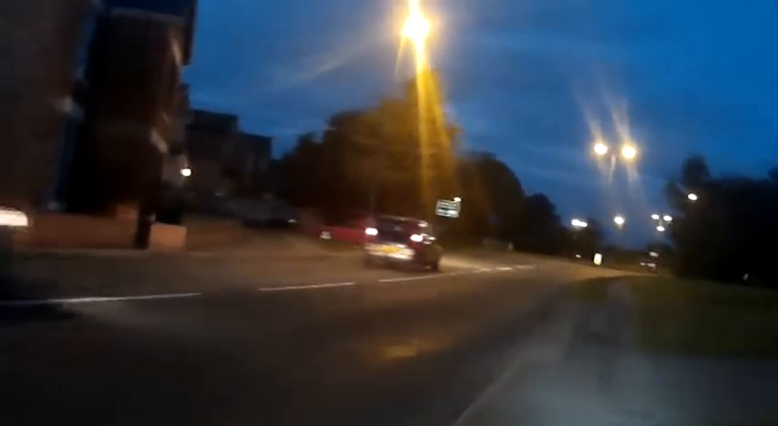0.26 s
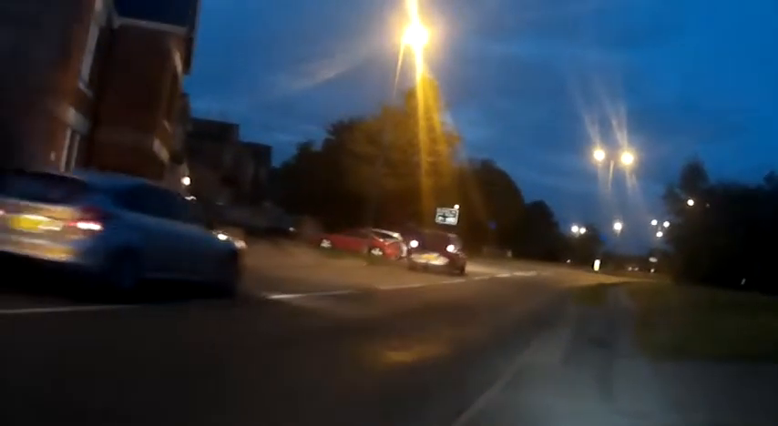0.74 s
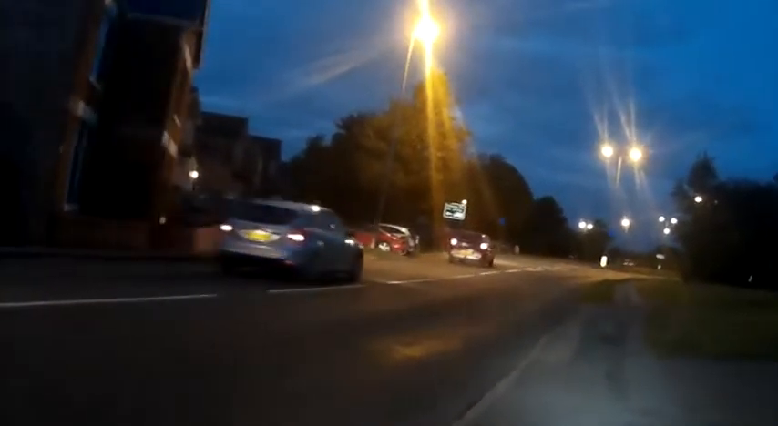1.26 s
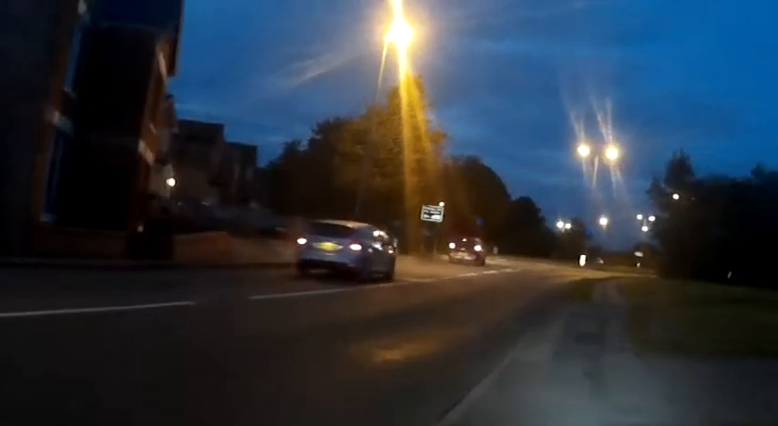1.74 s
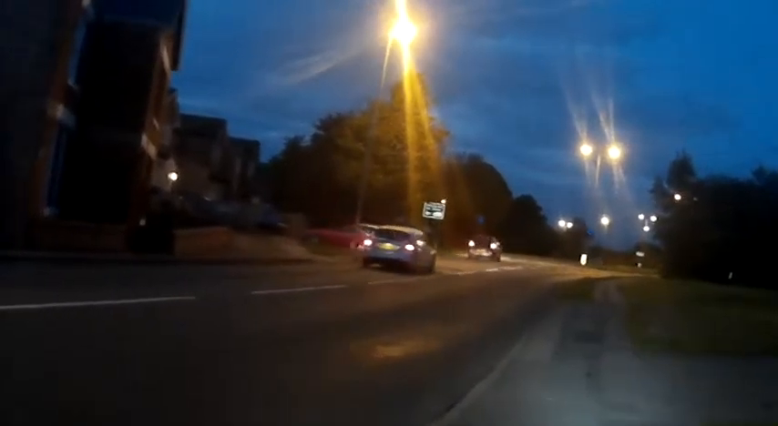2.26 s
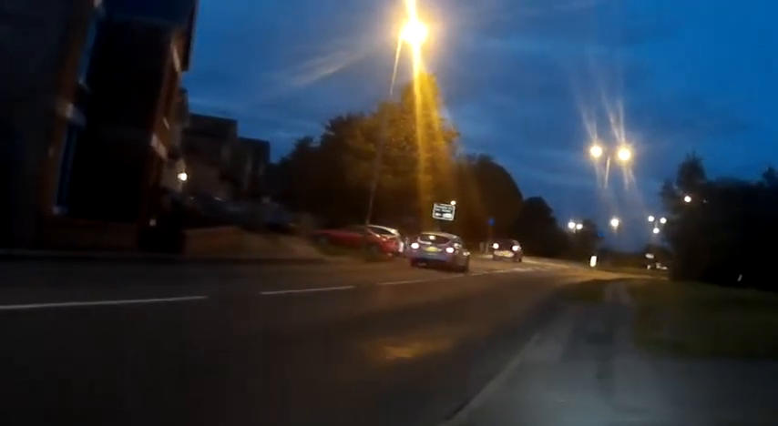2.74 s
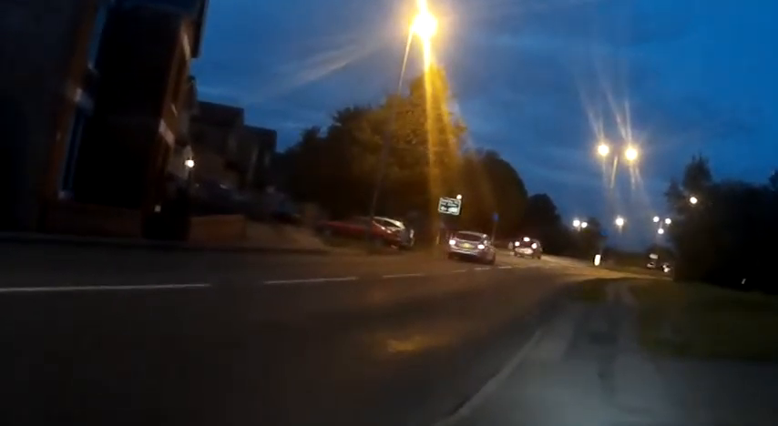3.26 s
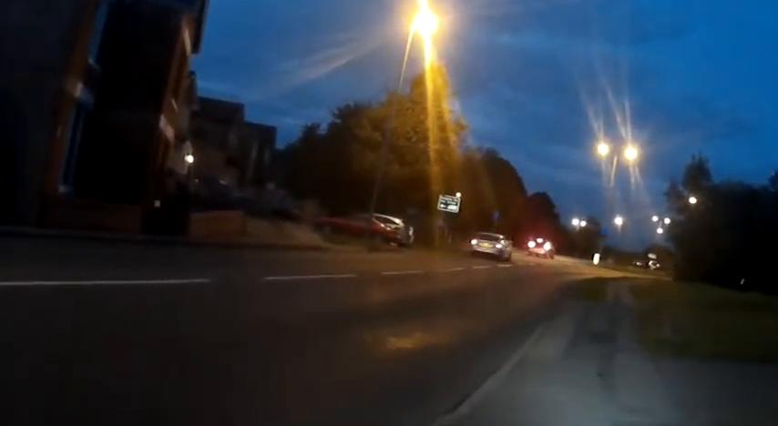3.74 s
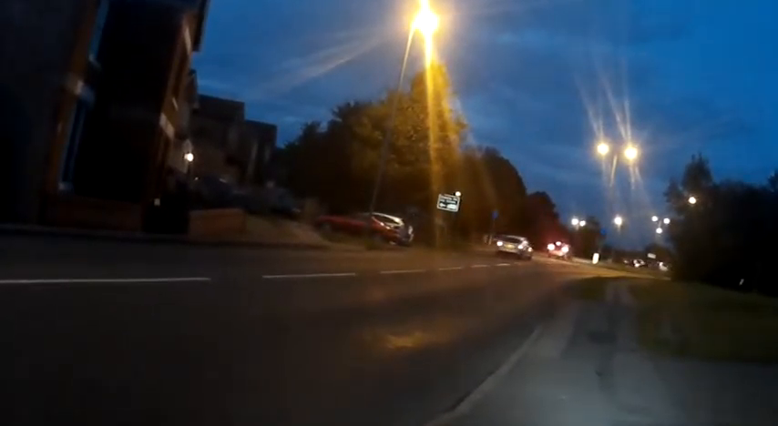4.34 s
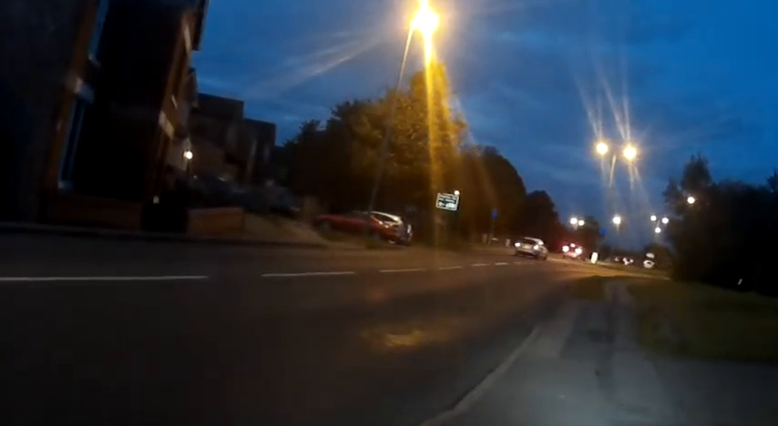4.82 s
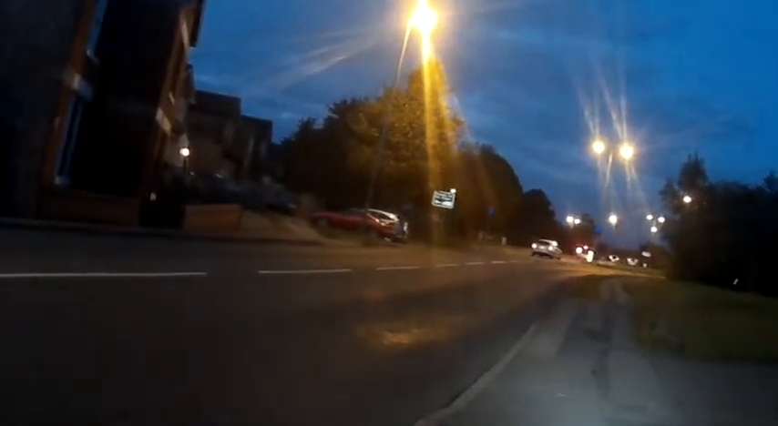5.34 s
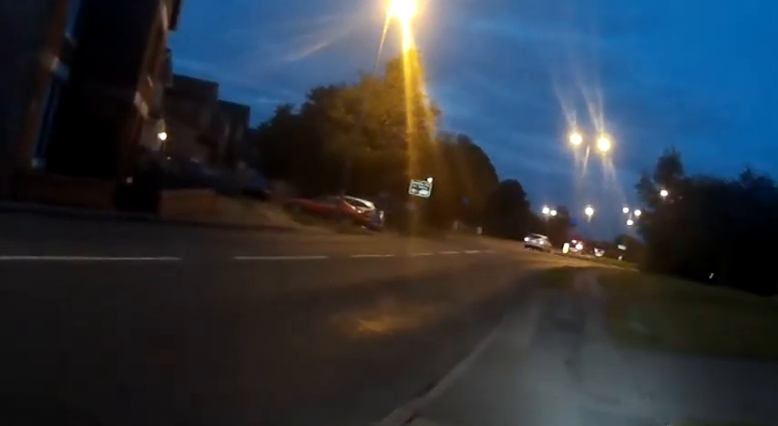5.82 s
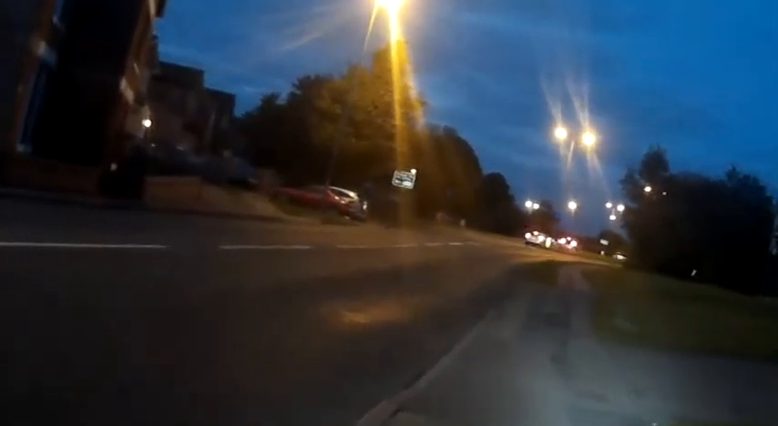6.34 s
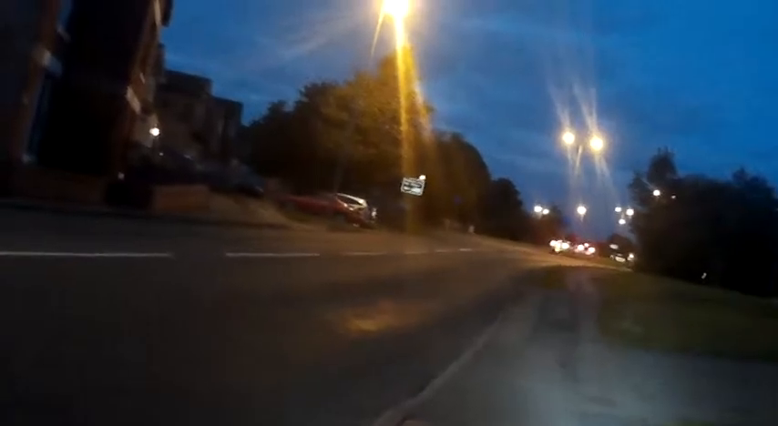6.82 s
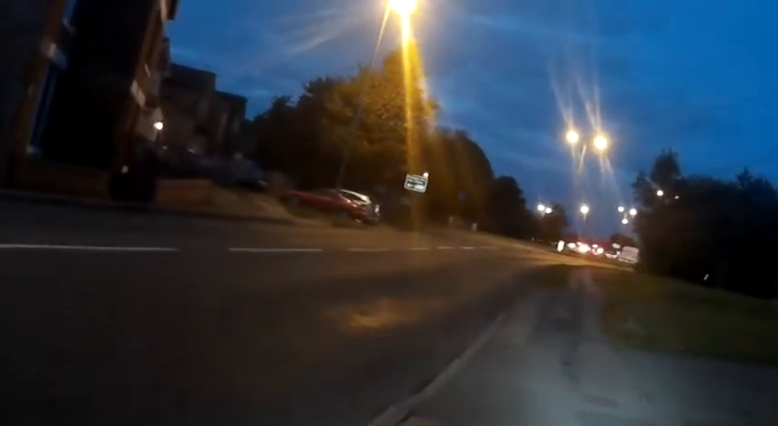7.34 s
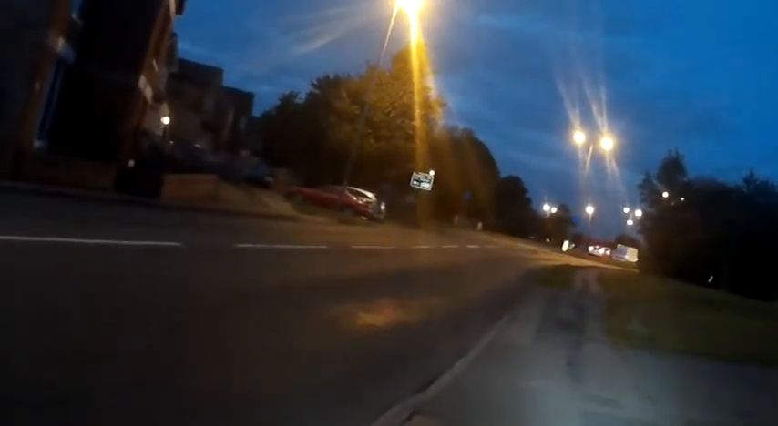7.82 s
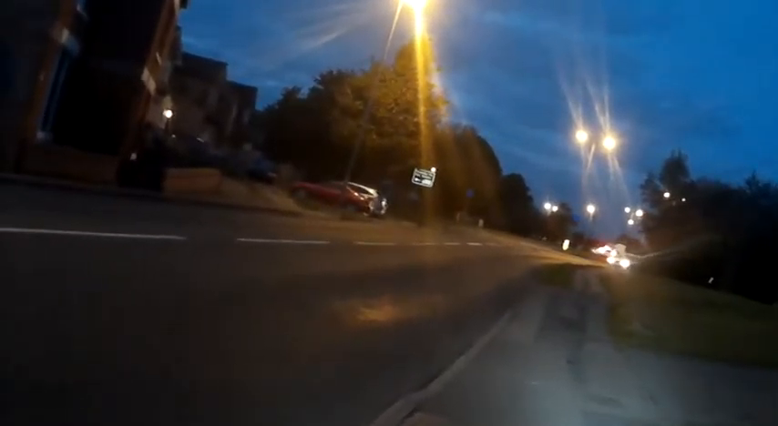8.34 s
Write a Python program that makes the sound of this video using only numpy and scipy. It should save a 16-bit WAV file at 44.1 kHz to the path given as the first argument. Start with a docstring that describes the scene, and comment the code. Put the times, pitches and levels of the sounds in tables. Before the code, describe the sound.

Sharp plastic clacks and hollow thumps from a bicycle's loose camera, with a brief car whoosh at the start and faint distant traffic afterwards.

```python
"""A small camera's plastic case knocks, rubs, rattles and creaks in its mount on a bicycle's handlebar.
Short blows and tiny catches ring the case, its mount and the bar, each built from resonances.
The case rings on in fading tones, low tones sway the bar, the frame trembles and a brake squeaks faintly.
A car passes and drives off: shaped broad noise, partly boxed in by the case, over a low street rumble.
The microphone adds a faint hiss and whine."""
import sys
import numpy as np
from scipy import signal
from scipy.fft import rfft, irfft, next_fast_len
from scipy.io import wavfile
from scipy.ndimage import uniform_filter1d, map_coordinates

SR = 44100
rng = np.random.default_rng(int(sys.argv[2]) if len(sys.argv) > 2 else 0)


def to_wav(s):
    """Save 16-bit WAV."""
    ch = np.atleast_2d(s).T  # columns
    pcm = np.round(np.clip(ch, -1, 1) * 32767)  # PCM
    wavfile.write(sys.argv[1], SR, pcm.astype(np.int16))


N = 377937
T = np.arange(N) / SR  # time of every sample [s]

# resonances of the plastic shell, before a blow favours some: (frequency [Hz], width [Hz], level [dB])
SHELL_MODES = [(552, 31, -7.5), (583, 120, -5.5), (724, 50, 2.5), (1026, 110, -7), (1277, 82, -0.5),
               (1695, 110, -3.5), (1906, 90, -6.5), (2144, 83, -6.5), (2460, 120, -16), (2720, 90, -11),
               (3160, 260, -11.5), (3960, 100, -18.5), (4400, 390, -19.5), (5700, 400, -20),
               (5920, 490, -22.5), (7700, 7900, -34.5), (11160, 700, -26), (14500, 2400, -41.5)]
# resonances of the mount, before a blow favours some: (frequency [Hz], width [Hz], level [dB])
MOUNT_MODES = [(232, 13, -11), (265, 17, 0.5), (336, 170, -7), (399, 26, 2.5), (445, 33, -6)]
# tone balance of the low street rumble: (frequency [Hz], relative level per Hz [dB])
STREET_SPECTRUM = [(20, -3.5), (40, 6), (70, -9), (150, -10.5), (300, -11.5), (600, -22.5), (2000, -46)]


def amp(db):
    """Turn decibels into a gain."""
    return 10 ** (np.asarray(db) / 20)


def unit(x):
    """Scale a sound to an rms of 1."""
    return x / np.sqrt(np.mean(x ** 2) + 1e-20)


def curves(rows):
    """Join the points of each column after the time with straight lines, one value per sample."""
    s, *columns = np.transpose(rows)
    return [np.interp(T, s, column) for column in columns]


def wobble(rate):
    """Draw a smooth random curve through `rate` random points a second."""
    points = rng.standard_normal(int(N * rate / SR) + 4)
    return map_coordinates(points, [T * rate])


def filtered(x, response):
    """Multiply the spectrum of a sound by a response that depends on frequency."""
    size = next_fast_len(len(x) + SR // 4)  # spare room, so that the ringing does not wrap around
    spectrum = rfft(x, size) * response(np.fft.rfftfreq(size, 1 / SR))
    return irfft(spectrum, size)[:len(x)]


def resonate(x, modes):
    """Send a force through a body whose resonances each ring at their own frequency."""
    def response(f):
        total = 0
        for k, (center, width, db) in enumerate(modes):
            damping = 1j * f * width
            peak = damping / (center * center - f * f + damping)
            total = total + (-1) ** k * amp(db) * peak  # every other mode is flipped
        return total
    return filtered(x, response)


def cut(x, hz, kind, order=2):
    """Keep only what lies below ("low") or above ("high") a frequency."""
    sos = signal.butter(order, min(hz, SR / 2 - 1), kind, fs=SR, output="sos")
    return signal.sosfilt(sos, x)


def noise(points):
    """Make noise of rms 1 whose tone balance follows (frequency [Hz], level [dB]) points."""
    hz, db = np.transpose(points)
    return unit(filtered(rng.standard_normal(N),
                         lambda f: amp(np.interp(np.log(f + 1), np.log(hz), db))))


def add(track, s, sound):
    """Mix a sound into the track at a time in seconds."""
    part = track[max(0, round(s * SR)):][:len(sound)]
    part += sound[:len(part)]


def struck(modes, favoured_hz, lift_db):
    """The place of a blow favours the resonances near one frequency."""
    reach_octaves = .22
    lifted = []
    for hz, width, db in modes:
        distance = np.log2(hz / favoured_hz) / reach_octaves
        lifted.append((hz, width, db + lift_db * np.exp(-distance ** 2)))
    return lifted


def shell(force, hardness_hz, modes):
    """The shell clacks; a soft contact barely reaches its high resonances."""
    return cut(cut(resonate(force, modes), hardness_hz, "low"), 610, "high")


def mount(force, modes):
    """The clamp answers a force with a hollow ring."""
    return cut(cut(resonate(force, modes), 810, "low"), 110, "high")


def bar(force):
    """The handlebar answers a force with a dull thump from two broad resonances."""
    # resonances of the bar: (frequency [Hz], width [Hz], level [dB])
    bar_modes = [(95, 140, -0.34), (144.96, 200, 0.34)]
    return cut(resonate(force, bar_modes), 390, "low")


def traffic(direct_db=-6, boxed_db=-2, car_rumble_db=3):
    """Broad noise, partly boxed in by the case, over a low rumble that grows when the noise is loud."""
    # level of the broad noise before slow wavering: passing car with rubbing and a brief swell of
    # background noise, then far traffic: (time [s], level [dB])
    broad_levels = [(0, -55), (.4, -55), (.7, -48.5), (.9, -47.5), (1.1, -64), (1.5, -63.5), (2, -66.5),
                    (3, -67), (3.6, -69), (4.4, -75.5), (5.2, -70.5), (7, -74.5), (8.57, -75)]
    # tone balance of the direct broad noise: (frequency [Hz], relative level per Hz [dB])
    broad_spectrum = [(40, -23), (100, -9.5), (250, -6.5), (570, -12), (1010, -15.5), (1300, -15),
                      (1800, -25), (2600, -29.5), (8000, -38.5), (14000, -55.5)]
    # resonances on the way through the air into the case: (frequency [Hz], width [Hz], level [dB])
    air_modes = [(397, 60, -2.5), (690, 140, -1), (1280, 210, 3), (1700, 140, -7.5), (1910, 73, -6),
                 (3300, 160, -22.5)]
    steady_rumble_db = -65
    broad_db, = curves(broad_levels)
    direct = noise(broad_spectrum)
    boxed = unit(cut(resonate(rng.standard_normal(N), air_modes), 3500, "low"))
    broad = amp(direct_db) * direct + amp(boxed_db) * boxed
    rumble_gain = np.hypot(amp(steady_rumble_db), amp(broad_db + car_rumble_db))
    return amp(broad_db + .8 * wobble(3.2)) * broad + rumble_gain * noise(STREET_SPECTRUM)


def sliding():
    """Each slide of the case swells, holds and dies away; gives gains for mount ring and shell scrape."""
    # slides: (time [s], length [s], mount ring level [dB], shell scrape level [dB])
    slide_list = [(0, 0.01, -51.5, -50), (0.132, 0.073, -49.5, -53), (0.307, .1, -58.5, -60),
                  (0.449, 0.11, -47.5, -53), (0.521, 0.096, -46, -45.5), (0.663, .06, -48.5, -51),
                  (0.725, 0.08, -37.5, -42.5), (0.836, 0.21, -62, -56.5), (1.1, 0.38, -64.5, -68.5),
                  (2.178, .07, -37, -42), (2.26, 0.13, -50.5, -52.5), (2.498, .14, -53.5, -58),
                  (5.329, .1, -52.5, -51.5), (5.407, .1, -47.5, -50.5), (5.514, 0.045, -46, -46),
                  (5.941, 0.052, -38, -45.5), (6.05, .03, -34.5, -38.5), (6.12, 0.098, -45.5, -63),
                  (6.247, 0.096, -52.5, -56.5), (6.5, 0.61, -64.5, -69.5), (7.99, 0.22, -58.5, -68.5)]
    attack_s, release_db_per_s = .02, 170
    gains = np.zeros((2, N))
    for s, length, ring_db, scrape_db in slide_list:
        swell = np.clip((T - s) / attack_s, 0, 1)
        fade = amp(-release_db_per_s * np.maximum(T - s - length, 0))
        gains = np.maximum(gains, amp([[ring_db], [scrape_db]]) * swell * fade)
    return gains


def rubbing(ring, scrape, hardness_hz=2100, thump_db=-11, ring_hz=410, scrape_hz=1300):
    """Sliding plastic catches on many tiny ridges of uneven size."""
    catches_per_s, spread_db, uneven_db = 900, 3, 2.5
    catches = (rng.random(N) < catches_per_s / SR) * rng.choice([-1, 1], N)
    sizes = amp(spread_db * np.minimum(rng.exponential(size=N), 3))
    force = catches * sizes * amp(uneven_db * wobble(60))
    hollow = unit(mount(force, struck(MOUNT_MODES, ring_hz, lift_db=1.5)))
    body = hollow + amp(thump_db) * unit(bar(force))
    scraping = unit(shell(force, hardness_hz, struck(SHELL_MODES, scrape_hz, lift_db=3)))
    return ring * body + scrape * scraping


def rattles(ring, scrape, ring_db=-10, clack_db=-8, hardness_hz=2500, ring_hz=310, chatter_s=.002):
    """The loose case taps at random while it slides; each tap is a short chatter."""
    taps_per_s, spread_db = 28, 4
    sizes = amp(spread_db * np.clip(rng.standard_normal(N), -2, 2))
    taps = (rng.random(N) < taps_per_s / SR) * sizes
    fading = signal.lfilter([1], [1, -np.exp(-1 / (chatter_s * SR))], taps)
    force = fading * rng.standard_normal(N)
    body = unit(mount(force, struck(MOUNT_MODES, ring_hz, lift_db=6)))
    clack = unit(shell(force, hardness_hz, struck(SHELL_MODES, 3100, lift_db=4.5)))
    return amp(ring_db) * ring * body + amp(clack_db) * scrape * clack


def knocks(chatter=300):
    """Each contact is a blow plus a chatter, stronger and duller the longer the faces touch."""
    # contacts of the case: (time [s], contact time [s], bar thump level [dB], mount ring level [dB],
    # favoured mount frequency [Hz], shell clack level [dB], favoured shell frequency [Hz])
    contacts = [ (.033, 0.0016, -75, -54, 270, -45.5, 1340), (.159, 0.0025, -52, -57, 400, -45, 1290),
                (0.174, 0.0024, -54, -71, 436, -37, 1110), (.367, 0.0012, -61, -55, 277, -47.5, 1720),
                (.512, 0.0022, -51, -49, 330, -43.5, 1160), (.549, 0.0022, -31, -36.5, 300, -46, 1290),
                (.56, 0.00073, -36, -39, 290, -38.5, 650), (.588, .002, -45, -51, 282, -42.5, 1290),
                (.61, 0.0013, -35.5, -34.5, 317, -42.5, 715), (0.717, 0.0027, -42, -29.5, 418, -40.5, 710),
                (.765, .0034, -61, -31.5, 327, -40, 715), (.781, 0.0033, -61, -51, 397, -36.5, 1700),
                (.811, .003, -52, -40, 414, -36.5, 1120), (0.828, 0.0013, -46.5, -58, 280, -39, 710),
                (1.11, 0.0027, -61, -55, 403, -64, 1020), (1.337, 0.0091, -61, -54, 407, -70, 1290),
                (1.526, 0.0031, -48, -51.5, 264, -65, 715), (2.1064, .0023, -67, -39, 318, -42, 690),
                (2.173, .002, -43.5, -34.5, 433, -42.5, 1020), (2.181, 0.0017, -39.5, -39, 395, -33.5, 760),
                (2.235, .0037, -54, -35, 397, -38, 715), (2.2557, 0.0011, -45, -31, 440, -22, 1700),
                (2.335, 0.0013, -49.5, -51, 280, -37.5, 1110), (2.357, .0009, -58, -52.5, 280, -61, 1970),
                (2.375, 0.0019, -48, -45.5, 394, -40, 1660), (2.3853, 0.0011, -38.5, -28, 340, -16.5, 820),
                (2.565, 0.0024, -76, -42.5, 264, -50.5, 1290),
                (2.604, 0.0012, -72, -42.5, 263, -55.5, 1290),
                (2.8707, 0.00053, -51.5, -27, 330, -26.5, 1780), (2.879, 0.00044, -35, -29, 290, -22, 2280),
                (2.881, 0.00037, -45.5, -34.5, 290, -23, 5600), (2.935, 0.0021, -40, -52, 276, -62, 630),
                (3.237, .003, -68, -55, 272, -75.5, 630), (4.859, .0033, -57.5, -55.5, 329, -64, 690),
                (4.958, .002, -82, -78, 330, -66.5, 1290), (5.3, .004, -43, -65, 280, -64, 630),
                (5.313, 0.0044, -42, -57, 290, -65, 1290), (5.547, 0.0049, -40.5, -54, 358, -62, 1290),
                (5.658, 0.0058, -70, -38, 360.4, -52.5, 1290), (5.855, 0.0058, -48.5, -49, 405, -56, 1290),
                (5.914, 0.0023, -41, -31.5, 424, -44.5, 1270), (5.921, 0.0019, -34, -40.5, 396, -46, 1270),
                (5.939, .001, -46.5, -22, 413, -36, 2800), (5.953, 0.0011, -33.5, -33, 400, -37.5, 2180),
                (6.001, .0016, -63, -48, 400, -50, 1800), (6.034, .002, -33, -28, 413, -42, 615),
                (6.067, .0022, -50.5, -23, 438, -26, 623), (6.075, 0.0011, -31, -22, 405, -33, 2910),
                (6.104, .002, -47.5, -40.5, 405, -42, 1850), (6.24, .0018, -44, -37.5, 404, -44, 1295),
                (6.679, 0.0026, -47.5, -53.5, 376, -62.5, 1290),
                (6.8425, 0.0016, -66, -29.5, 330, -37, 1290), (6.8475, 0.0014, -63, -31, 303, -31, 2710),
                (7.021, .0045, -70, -45.5, 330, -76, 1290), (7.328, 0.0033, -63.5, -48, 397, -70.5, 1290),
                (7.576, 0.0017, -59, -64, 277, -69, 1640), (7.999, 0.003, -60.5, -41, 390, -52.5, 1290),
                (8.037, 0.0042, -56, -43, 435, -50.5, 1295), (8.144, 0.0028, -70, -44.5, 369, -56.5, 1290),
                (8.165, 0.005, -74, -48.5, 300, -72, 630)]
    usual_contact_s = .002
    # reach into the shell's high resonances at the usual contact; how fast it rises for briefer ones
    hardness_hz, hardness_power = 1380, 1.25
    track, t = np.zeros(N), np.arange(SR // 3) / SR
    first = SR // 40  # levels hold for the first 25 ms of each sound
    for s, contact, thump_db, ring_db, ring_hz, clack_db, clack_hz in contacts:
        contact = max(contact, 1e-4)
        u, brevity = t / contact, usual_contact_s / contact
        force = chatter * contact * rng.standard_normal(len(t)) * u * np.exp(-u)
        force[0] += 1  # the blow itself
        mount_modes = struck(MOUNT_MODES, ring_hz, lift_db=10)
        shell_modes = struck(SHELL_MODES, clack_hz, lift_db=10)
        parts = [(bar(force), thump_db),
                 (mount(force, mount_modes), ring_db),
                 (shell(force, hardness_hz * brevity ** hardness_power, shell_modes), clack_db)]
        for sound, db in parts:
            add(track, s, amp(db) * sound / np.std(sound[:first]))
    return track


def shudder(case, top_hz=110):
    """The frame trembles with the noise of the case and calms a moment later."""
    level_db, calm_s = -13, 0.35  # level against the smoothed strength of the case's noise
    keep = np.exp(-1 / (calm_s * SR))
    strength = signal.lfilter([1 - keep], [1, -keep], np.abs(case))
    return amp(level_db) * strength * cut(noise(STREET_SPECTRUM), top_hz, "low")


def case_ring(fade_s=0.38, rise_s=.008, unsteady=.5):
    """The plastic case rings on after a jolt: a few fading tones with unsteady phase."""
    # tones of the ringing case: (frequency [Hz], level before rise and fade [dB])
    tones = [(500, -43), (705, -47), (1275, -38), (1660, -51)]
    start_s = .188
    t = np.maximum(T - start_s, 0)
    ring = 0
    for hz, db in tones:
        ring = ring + amp(db) * np.sin(2 * np.pi * hz * t + unsteady * wobble(88.0))
    return amp(-60 * t / fade_s) * (1 - np.exp(-t / rise_s)) * ring  # falls 60 dB in fade_s


def sways():
    """Frame and bar swing at low frequencies after a shove and settle."""
    # swings: (time [s], frequency [Hz], level before rise and fade [dB], time to fall by 60 dB [s])
    swings = [(0.53, 38, -29, 0.27), (0.726, 39, -25.5, 0.92), (2.17, 33.7, -40.5, 0.85),
              (2.88, 55, -35, .37), (2.879, 93.5, -48, 1.2), (4.861, 86.3, -41, 0.14),
              (5.296, 87, -31.5, 0.36), (5.319, 66.6, -29.5, .55), (5.541, 42.7, -35, .51),
              (5.921, 32, -28, .29), (6.072, 100, -27, 0.164), (6.5, 35, -50, 2.4)]
    rise_cycles = .65
    track, t = np.zeros(N), np.arange(2 * SR) / SR
    for s, hz, db, fade_s in swings:
        envelope = amp(db - 60 * t / fade_s) * (1 - np.exp(-t * hz / rise_cycles))
        add(track, s, envelope * np.sin(2 * np.pi * hz * t))
    return track


def creak(hardness_hz=1800, low_hz=1100, pitch_hz=1330):
    """The joint sticks and slips in a quick, nearly even run; each slip is a tick and a gritty slide."""
    # sticking and slipping in the mount: (time [s], slips per second [1/s], level [dB])
    slip_curve = [(5.335, 72, -49.5), (5.365, 73, -45.5), (5.395, 76, -38.5), (5.42, 76, -41.5),
                  (5.435, 76, -53)]
    slide_s, grit = .002, .09
    rate, db = curves(slip_curve)
    slipping = (T >= slip_curve[0][0]) & (T < slip_curve[-1][0])
    # a slip happens whenever the running count passes a whole number
    slips = np.diff(np.ceil(np.cumsum(rate * slipping) / SR), prepend=0)
    slides = signal.lfilter([1], [1, -np.exp(-1 / (slide_s * SR))], slips)
    force = slips + grit * slides * rng.standard_normal(N)
    clack = shell(force, hardness_hz, struck(SHELL_MODES, pitch_hz, lift_db=9.0))
    sound = cut(clack, low_hz, "high", order=4)
    return amp(db) * sound / np.std(sound[slipping])


def squeak(octave_db=-4, waver=0.00715):
    """A brake pad sings briefly, sinking in pitch: a wavering tone and its octave."""
    # the brake's song: (time [s], pitch before wavering [Hz], level of the lower tone [dB])
    song = [(6.9, 955, -62), (6.95, 914.4, -62), (6.98, 912.4, -61), (7.02, 900, -65), (7.07, 897.6, -69)]
    hz, db = curves(song)
    phase = 2 * np.pi * np.cumsum(hz * (1 + waver * wobble(53))) / SR
    singing = (T > song[0][0]) * (T < song[-1][0])
    return amp(db) * singing * (np.sin(phase) + amp(octave_db) * np.sin(2 * phase))


def scene():
    """Add up the jolted case, the bicycle and the road."""
    ring, scrape = sliding()
    contact = rubbing(ring, scrape) + rattles(ring, scrape) + knocks() + creak()
    bicycle = shudder(contact) + sways() + squeak()
    return (traffic() + contact + case_ring() + bicycle)[None]


def record(dry, hiss_db=-67.0, whine_db=-76, knee_db=-50, swell=0.19, top=0.94):
    """The microphone hisses and whines, more when driven; peaks are rounded and the top treble cut off."""
    whine_hz, top_hz = 6804, 15750
    x = dry[0]
    level = np.sqrt(np.abs(uniform_filter1d(x ** 2, size=SR // 3)))
    drive = level / (level + amp(knee_db))  # 0 in silence, near 1 when loud
    hiss_noise = noise([(100, 2), (2000, 1.9), (8000, -0.15), (15000, -0.28)])
    hiss = amp(hiss_db) * (1 + swell * drive ** 2) * hiss_noise
    phase = 2 * np.pi * whine_hz * T
    whine = amp(whine_db) * drive * (np.sin(phase) + amp(-16.0) * np.sin(2 * phase))
    rounded = x / (1 + np.abs(x / top) ** 6) ** (1 / 6)
    return filtered(rounded + hiss + whine, lambda hz: hz < top_hz)[None]


dry = scene()
out = record(dry)
to_wav(out)
```